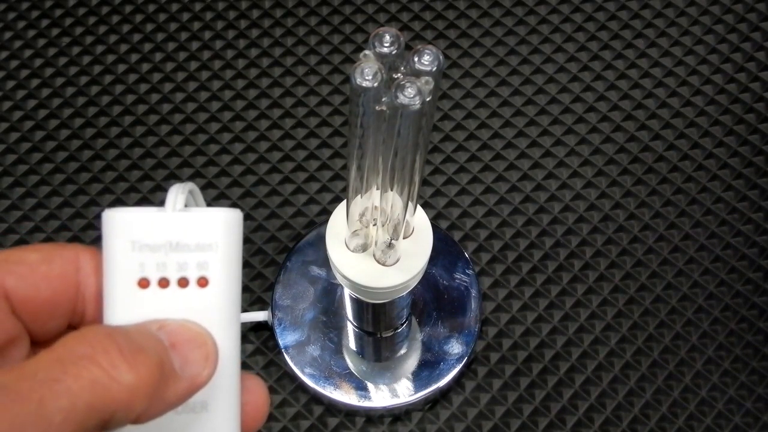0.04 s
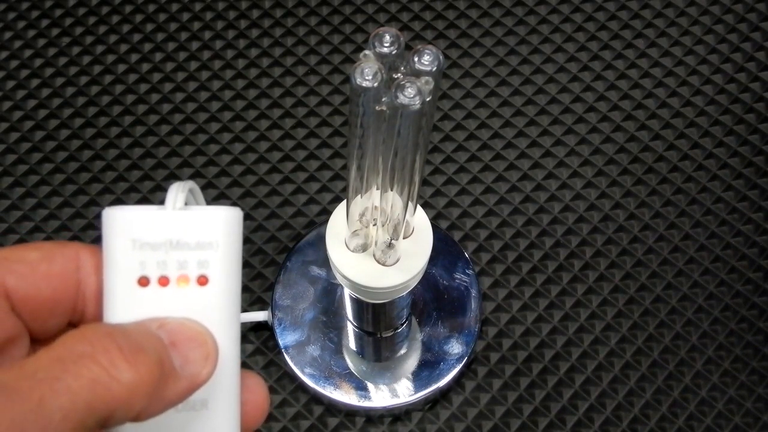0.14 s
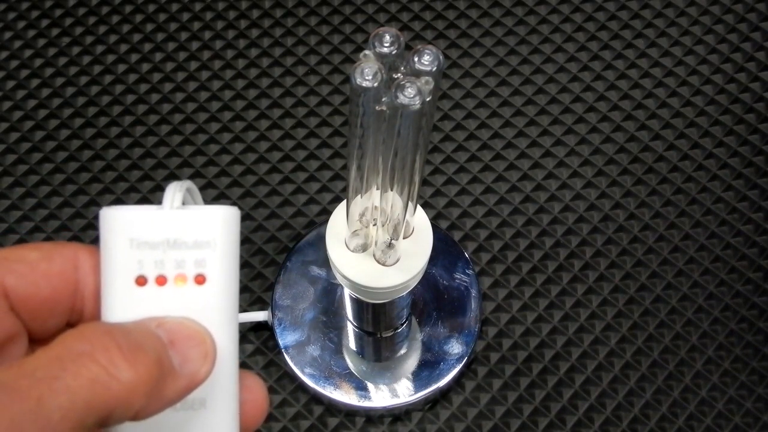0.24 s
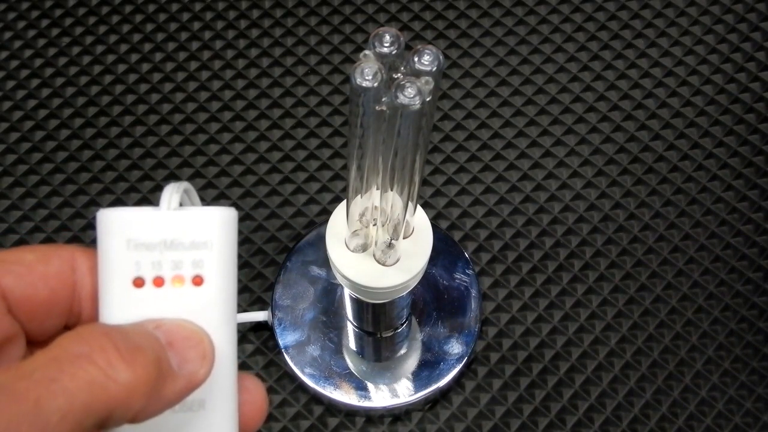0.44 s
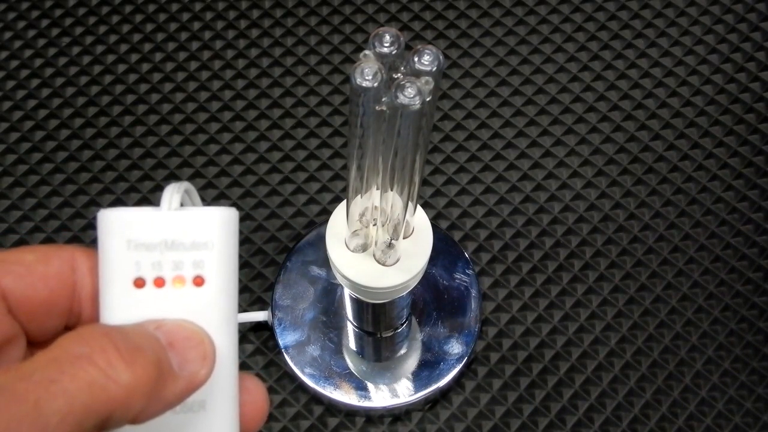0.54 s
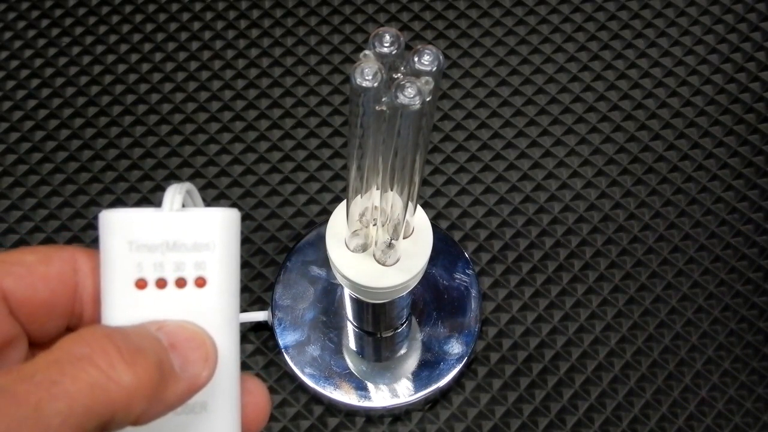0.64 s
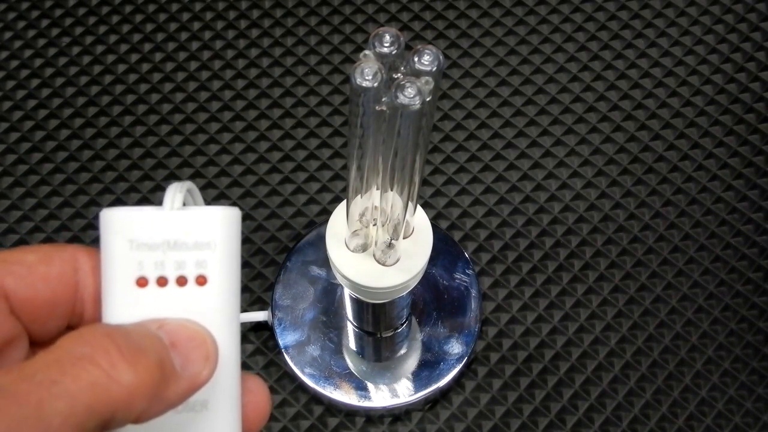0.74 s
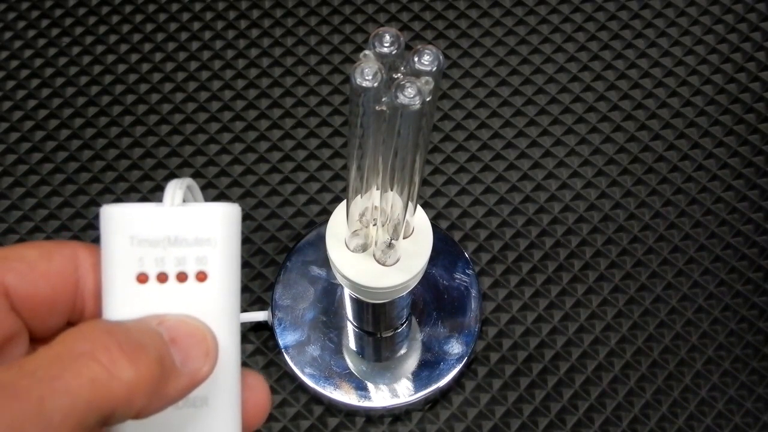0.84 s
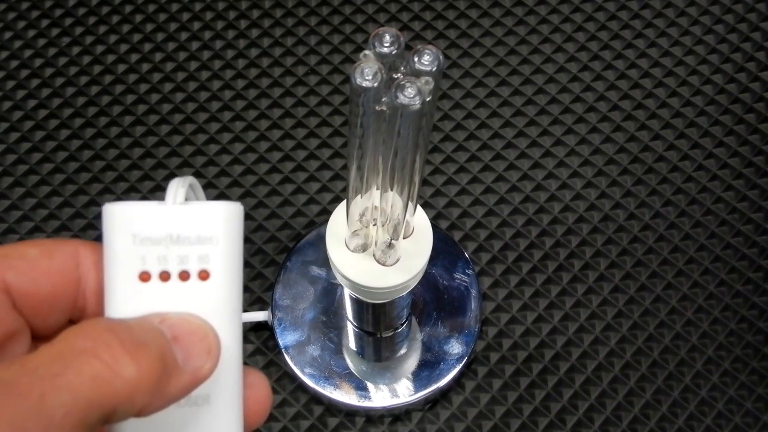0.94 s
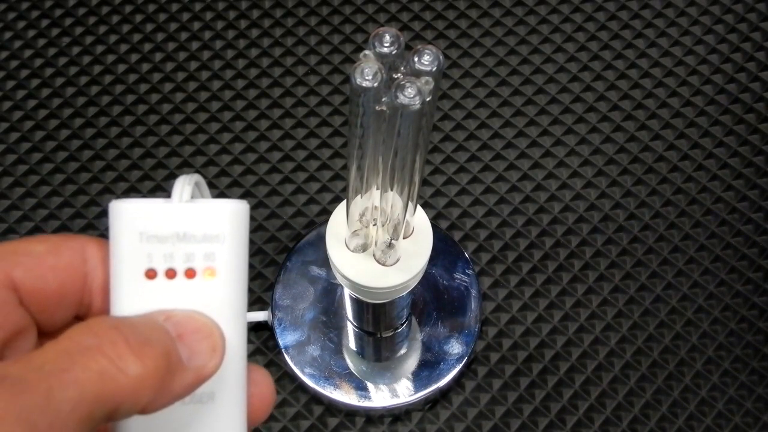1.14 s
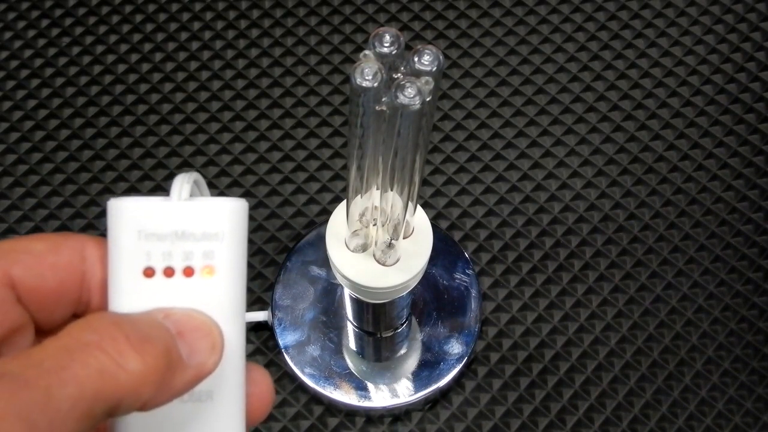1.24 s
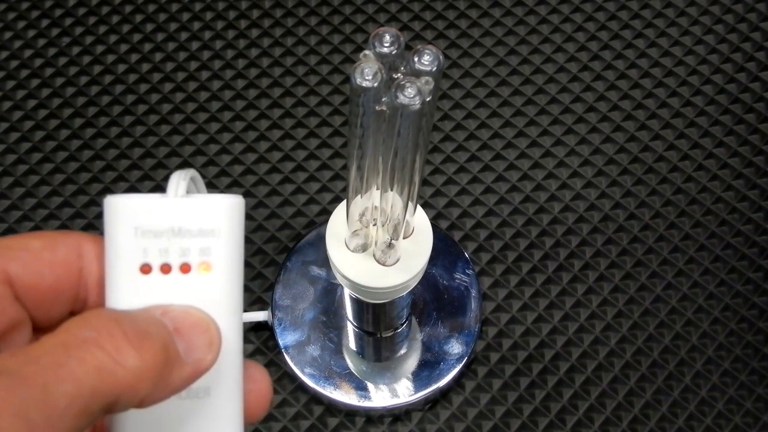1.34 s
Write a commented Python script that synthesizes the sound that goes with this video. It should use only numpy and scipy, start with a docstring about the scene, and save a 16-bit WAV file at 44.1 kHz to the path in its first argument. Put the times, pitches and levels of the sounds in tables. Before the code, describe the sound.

Close, crisp button press and low soft release, a quiet gap, slight grip rustle and bumps, a second crisp press, then a barely audible tick; small indoor room, steady faint hiss and hum.

```python
"""Timer button, close and quiet

A thumb works the push button of a small plastic timer switch, held close to a stereo microphone in a quiet room.
Each press snaps a metal dome and rings the case; the release is a duller knock. Both are sums of decaying cosines,
followed by a table echo, near scatter and a room tail. Before the second press the hand starts to rustle and bump:
shaped noise. A faint narrow-band tick ends the scene; steady coloured noise and a faint hum lie underneath."""
import sys
import numpy as np
from scipy import signal
from scipy.fft import rfft, irfft
from scipy.io import wavfile

SR = 44100
rng = np.random.default_rng(int(sys.argv[2]) if len(sys.argv) > 2 else 0)


def generate_wav(sig):
    """Save sig (samples, or channels by samples) to the path in sys.argv[1] as 16-bit PCM at SR."""
    pcm = np.round(np.clip(np.atleast_2d(sig).T, -1, 1) * 32767).astype(np.int16)
    wavfile.write(sys.argv[1], SR, pcm)


N = 61739
TIME = np.arange(N) / SR                          # s
HZ = np.maximum(np.fft.rfftfreq(N, 1 / SR), 1)    # kept above zero for the logarithms

# Colour of the steady room noise: [f/Hz, relative level per Hz/dB]
AIR_COLOUR = [(18, -58), (30, -25.5), (124, -16), (149, -12), (165, -7), (178, -1), (214, -5), (264, 0),
              (309, -4), (344, -4), (392, -5), (435, -5.5), (628, -11.5), (755, -6.5), (816, -7.5),
              (1010, -1), (1420, -14.5), (1610, -2.5), (1840, -2), (2330, -11), (2800, -12), (4370, -18.5),
              (6480, -26), (14600, -28), (15800, -28.5)]
# Likeness of the left and right noise: [f/Hz, correlation]
CHANNEL_LIKENESS = [(40, .1), (150, 0.44), (300, 0.7), (600, 0.44), (1000, 0.71), (1900, 0.78), (3500, 0),
                    (7000, 0.12), (14000, 0)]
# Colour of the hand shifting its grip: [f/Hz, relative level per Hz/dB]
RUSTLE_COLOUR = [(100, -24), (280, 4.5), (450, -5.5), (650, -6.5), (1000, -3.5), (1400, -1), (2100, -0.5),
                 (3000, -12), (4600, -11), (6500, -19.5), (10000, -34)]
# Soft bumps of the grip: [t of the peak/s, bell width (sigma)/s, level/dB]
GRIP_BUMPS = [(0.985, 0.024, -58.5), (1.063, 0.013, -53.5), (1.2, 0.017, -61.5)]
# Faint, short narrow-band tick at the end: (t of the peak/s, bell width (sigma)/s, f/Hz, level/dB)
END_TICK = (1.393, .005, 3830, -57)
# Colour of the room's tail: [f/Hz, gain/dB]
TAIL_COLOUR = [(300, -9), (1000, -4), (2000, -8), (3300, 1), (4800, -9), (6300, -7), (8000, -11),
               (12000, 1)]
# The button goes down: [t/s, level/dB]
PRESS_STROKES = [(0.2095, 0), (1.215, -0.14)]
# The button comes back up: [t/s, level/dB]
RELEASE_STROKES = [(0.4267, 0)]
# Snap of the dome, before the click filters:
# [f/Hz, rise to the peak/s, level on press/dB, level on release/dB, left over right/dB]
DOME_MODES = [(1100, 0.00069, -20, -18, -0.2), (1800, 0.00042, -43, -28.5, 1.2),
              (2605, 0.00052, -20.5, -61, 3), (4673, 0.000672, -5, -35, 7), (6540, 0.000622, -31, -45, 6),
              (7670, 0.000696, -31, -52, 9), (12100, 0.000324, -46, -66.9, 4)]
# Ring of the plastic case, before the click filters:
# [f/Hz, t60/s, level on press/dB, level on release/dB, left over right/dB]
CASE_RINGS = [(678, 0.019, -46, -37, -0.7), (1121, 0.022, -37.5, -35, -5), (1411, 0.012, -23.5, -27.5, 0.2),
              (1703, 0.013, -25.5, -26.5, -1), (1936, 0.047, -40, -39, 3.5), (2285, 0.018, -32.5, -70, -3),
              (3097, 0.02, -24, -44.5, 2.5), (3377, 0.024, -29, -59, -4), (4590, 0.057, -35, -52, 3),
              (5270, 0.025, -29, -70, 0.8), (6090, 0.011, -28.4, -51, 4)]

AIR_DB = -53.5                   # rms
HUM_HZ, HUM_DB = 179.2, -77      # rms
RUSTLE_START_S, RUSTLE_ATTACK_S, RUSTLE_HOLD_S, RUSTLE_T60_S = 0.97, 0.07, 0.22, 1
RUSTLE_DB = -53.5                # rms while held
BUMP_HZ, BUMP_OCTAVES = 293, 0.24
TICK_OCTAVES = 0.02
TABLE_ECHO_S, TABLE_ECHO_DB = 0.00362, -15
NEAR_DB, NEAR_T60_S, NEAR_DELAY_S = -14.5, 0.049, 0.0014    # hand, lamp and table
ROOM_DB, ROOM_T60_S, ROOM_DELAY_S = -15.5, 0.4, 0.016
ECHO_DULL_HZ = 4240              # table echo and near scatter come back duller
SNAP_SWELL = 3.0                 # exponent: how steeply the snap builds up
CASE_LAG_S, CASE_RISE_S = 0.000482, 0.00021    # the case takes up the blow
HOLLOW_HZ, HOLLOW_Q = 4080, 1.98               # a hollow in the click's colour
MIC_LOW_CUT_HZ = 170             # microphone low cut: little bass in the clicks
CUTOFF_HZ = 15900


def from_db(db):
    """Decibels to amplitude gain."""
    return 10 ** (np.asarray(db) / 20)


def over_hz(points):
    """A table of (f/Hz, value) read along a logarithmic frequency axis."""
    hz, value = np.transpose(points)
    return np.interp(np.log(HZ), np.log(hz), value)


def decay(t, t60):
    """Exponential decay that falls by 60 dB in t60 seconds."""
    return np.exp(-np.log(1000) * t / t60)


def panned(x, db):
    """Mono to stereo, the left louder than the right by db."""
    return x * from_db(np.array([[db / 2], [-db / 2]]))


def noise(spectrum_db):
    """Stereo noise of a given colour, rms 1; mid and side shares set the likeness of the channels."""
    mid, side = rfft(rng.standard_normal((2, N)))
    alike = np.clip(over_hz(CHANNEL_LIKENESS), -.99, .99)
    common = np.sqrt(1 + alike) * mid
    opposed = np.sqrt(1 - alike) * side * [[1], [-1]]
    x = irfft(from_db(spectrum_db) * (common + opposed), N)
    return x / np.sqrt(np.mean(x ** 2))


def band(hz, octaves):
    """Noise in one resonance, rms 1."""
    return noise(-20 * np.log10(1 + (np.log2(HZ / hz) / octaves) ** 2))


def swell(peak_s, width_s, db):
    """A bell-shaped rise and fall of level."""
    return from_db(db) * np.exp(-.5 * ((TIME - peak_s) / width_s) ** 2)


def room_noise():
    """Background: steady airy noise with a faint sine hum, equal in both channels."""
    air = from_db(AIR_DB) * noise(over_hz(AIR_COLOUR))
    hum = from_db(HUM_DB) * np.sqrt(2) * np.sin(2 * np.pi * HUM_HZ * TIME)
    return air + hum


def end_tick():
    """A faint, short tick near 3.8 kHz at the end: narrow-band noise under a bell-shaped envelope."""
    peak_s, width_s, hz, db = END_TICK
    return swell(peak_s, width_s, db) * band(hz, TICK_OCTAVES)


def reflections(x, delay, t60):
    """Mono into a dense dying cloud of echoes: decaying noise of unit energy, different in each channel."""
    t = TIME - delay
    tail = rng.standard_normal((2, N)) * (t > 0) * decay(np.abs(t), t60)
    tail /= np.sqrt(np.sum(tail ** 2, axis=1, keepdims=True))
    return signal.fftconvolve(x[None], tail, axes=1)[:, :N]


def surroundings(x):
    """The delayed echo off the table, scatter from things close by and the room's coloured tail."""
    low_pass = signal.butter(1, ECHO_DULL_HZ, fs=SR, output="sos")
    dull = signal.sosfilt(low_pass, x + 1e-18)    # tiny offset avoids slow denormal numbers
    echo = from_db(TABLE_ECHO_DB) * np.interp(TIME - TABLE_ECHO_S, TIME, dull)
    near = from_db(NEAR_DB) * reflections(dull, NEAR_DELAY_S, NEAR_T60_S)
    coloured = irfft(rfft(x) * from_db(over_hz(TAIL_COLOUR)), N)
    room = from_db(ROOM_DB) * reflections(coloured, ROOM_DELAY_S, ROOM_T60_S)
    return echo + near + room


def hand():
    """The hand shifts its grip: a noise rustle that swells, holds and fades, with a few low bumps."""
    t = TIME - RUSTLE_START_S
    attack = np.clip(t / RUSTLE_ATTACK_S, 0, 1)
    fade = decay(np.maximum(t - RUSTLE_ATTACK_S - RUSTLE_HOLD_S, 0), RUSTLE_T60_S)
    rustle = from_db(RUSTLE_DB) * attack * fade * noise(over_hz(RUSTLE_COLOUR))
    bumps = sum(swell(*bump) for bump in GRIP_BUMPS) * band(BUMP_HZ, BUMP_OCTAVES)
    return rustle + bumps


def dome_snap(t, pressed):
    """The metal dome flips: each mode swells to its peak and dies within a few milliseconds."""
    out = np.zeros((2, N))
    for hz, rise, press_db, release_db, pan_db in DOME_MODES:
        level = from_db(press_db if pressed else release_db)
        envelope = (t / rise * np.exp(1 - t / rise)) ** SNAP_SWELL
        out += panned(level * envelope * np.cos(2 * np.pi * hz * (t - rise)), pan_db)
    return out


def case_ring(t, pressed):
    """The plastic case, struck by the button: modes that rise fast and die exponentially."""
    out = np.zeros((2, N))
    for hz, t60, press_db, release_db, pan_db in CASE_RINGS:
        level = from_db(press_db if pressed else release_db)
        envelope = (1 - np.exp(-t / CASE_RISE_S)) * decay(t, t60)
        out += panned(level * envelope * np.cos(2 * np.pi * hz * t), pan_db)
    return out


def click(start, pressed):
    """One stroke of the button: the brief snap, then the slightly later ring of the case."""
    t = np.maximum(TIME - start, 0)
    return dome_snap(t, pressed) + case_ring(np.maximum(t - CASE_LAG_S, 0), pressed)


def button():
    """All presses and releases up close, hollowed by a notch and thinned by the microphone's low cut."""
    presses = sum(from_db(db) * click(s, True) for s, db in PRESS_STROKES)
    releases = sum(from_db(db) * click(s, False) for s, db in RELEASE_STROKES)
    notch = signal.iirnotch(HOLLOW_HZ, HOLLOW_Q, fs=SR)
    hollow = signal.lfilter(*notch, presses + releases + 1e-18)
    low_cut = signal.butter(2, MIC_LOW_CUT_HZ, "high", fs=SR, output="sos")
    return signal.sosfilt(low_cut, hollow)


def scene():
    """The close clicks with their reflections, the hand, the end tick and the room noise."""
    clicks = button()
    return clicks + surroundings(clicks.mean(axis=0)) + hand() + end_tick() + room_noise()


def record(dry):
    """The top is cut steeply, without phase shift."""
    low_pass = signal.ellip(10, .05, 60, CUTOFF_HZ, fs=SR, output="sos")
    return signal.sosfiltfilt(low_pass, dry)


dry = scene()
out = record(dry)
generate_wav(out)
```